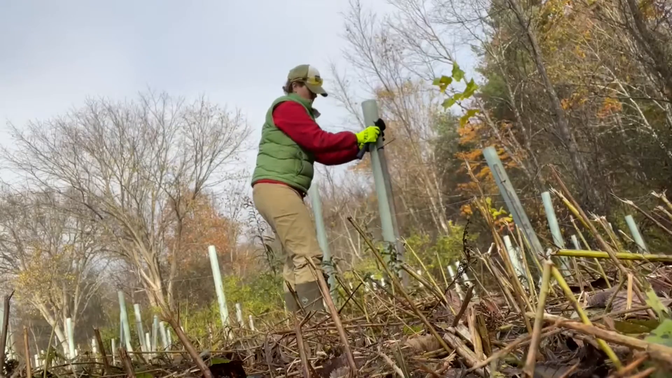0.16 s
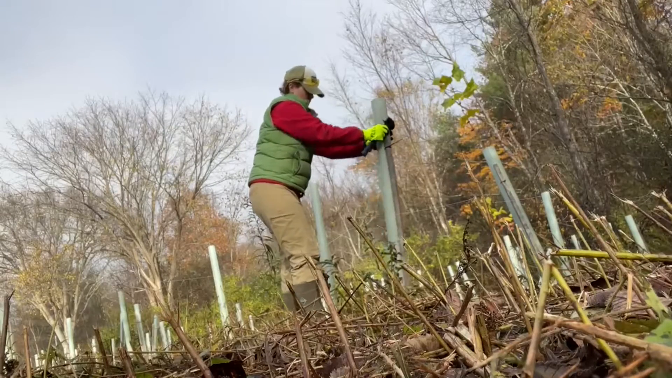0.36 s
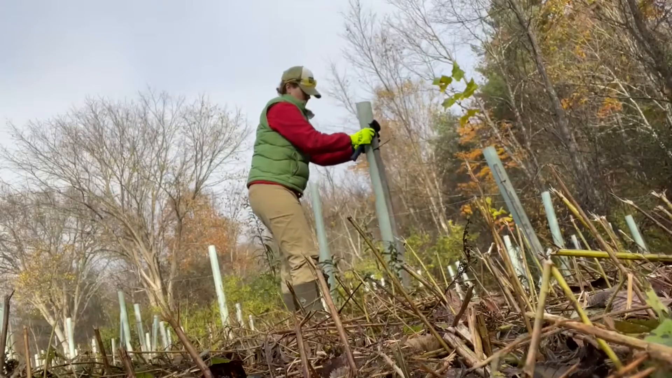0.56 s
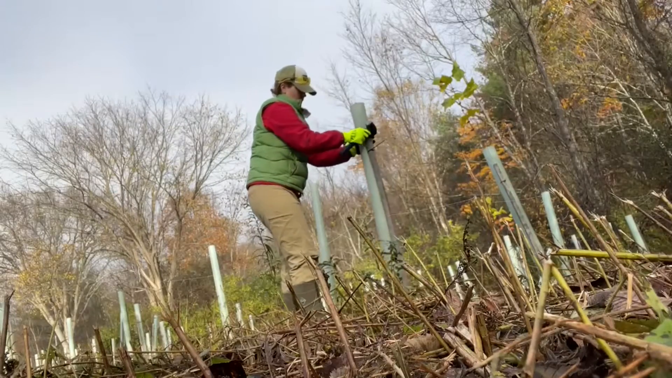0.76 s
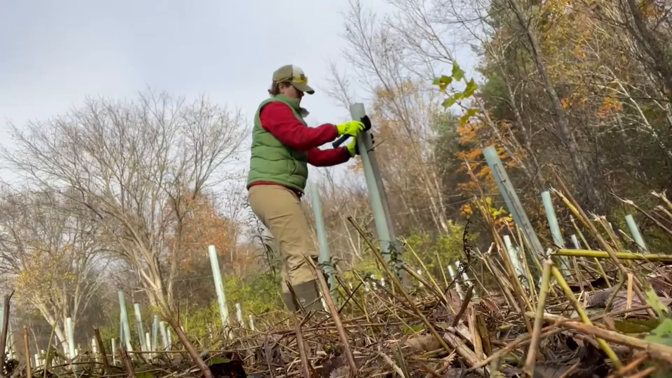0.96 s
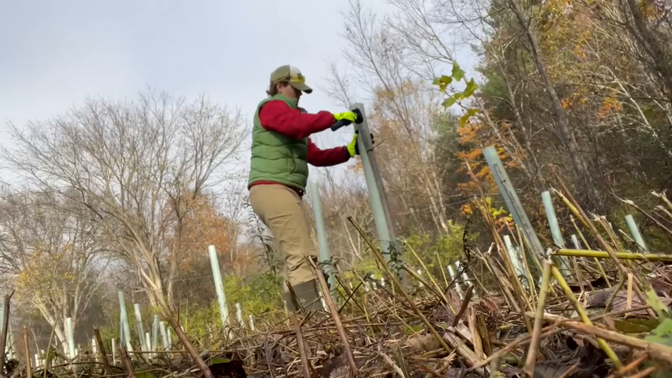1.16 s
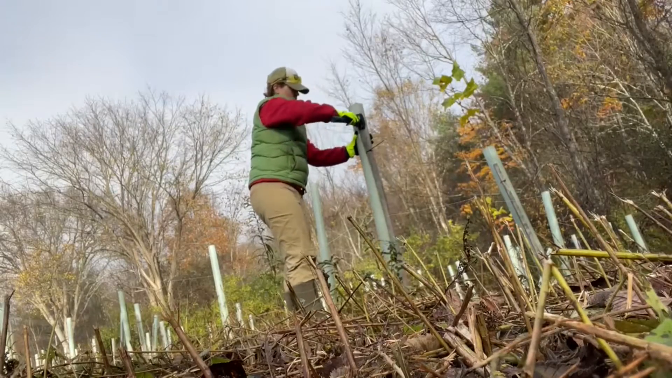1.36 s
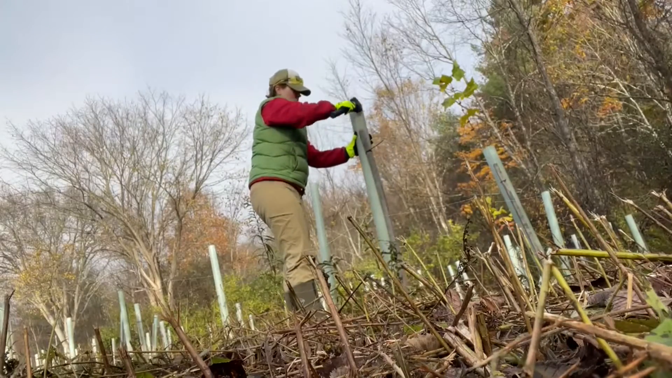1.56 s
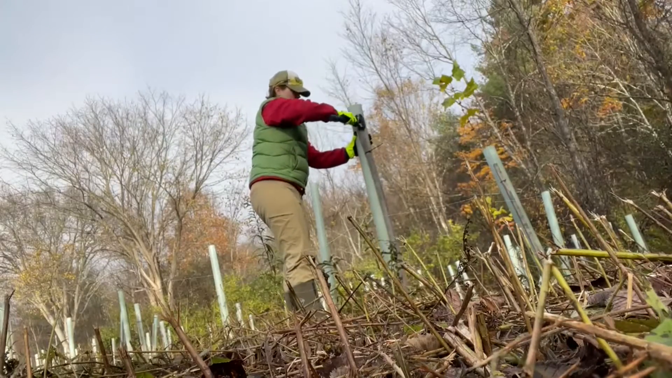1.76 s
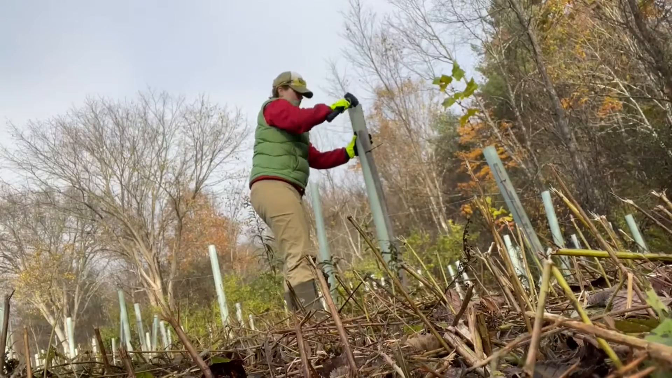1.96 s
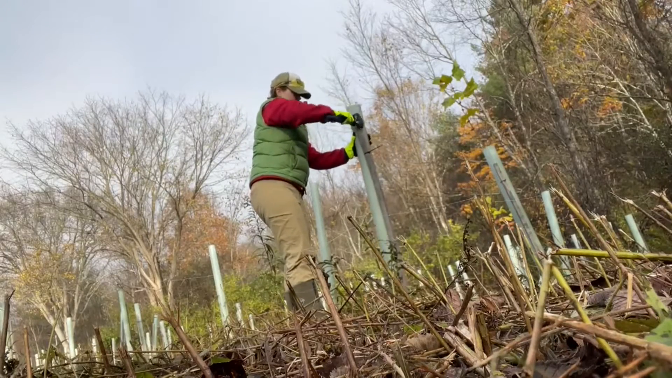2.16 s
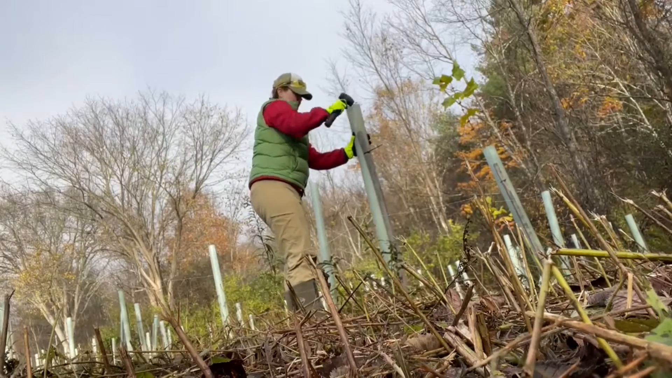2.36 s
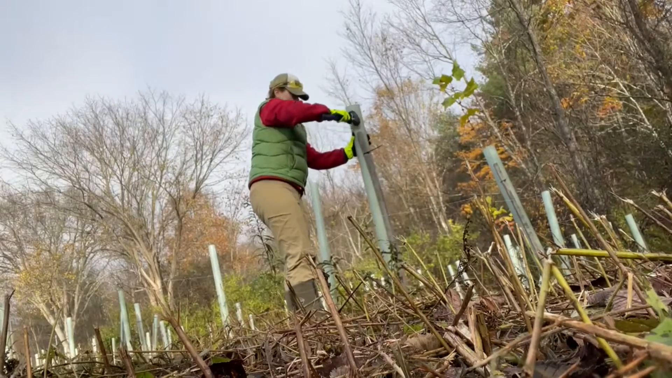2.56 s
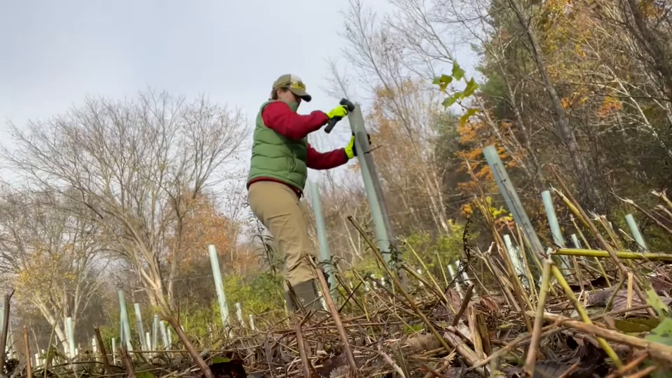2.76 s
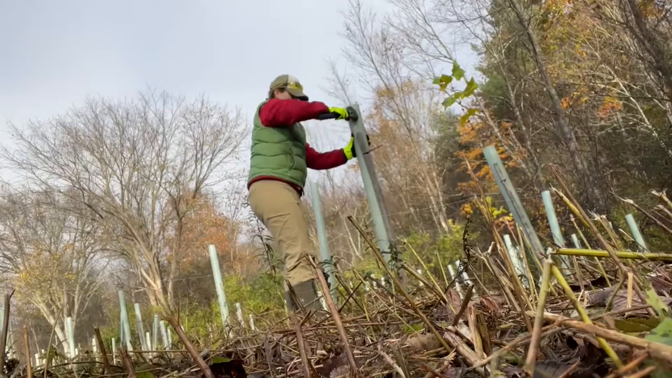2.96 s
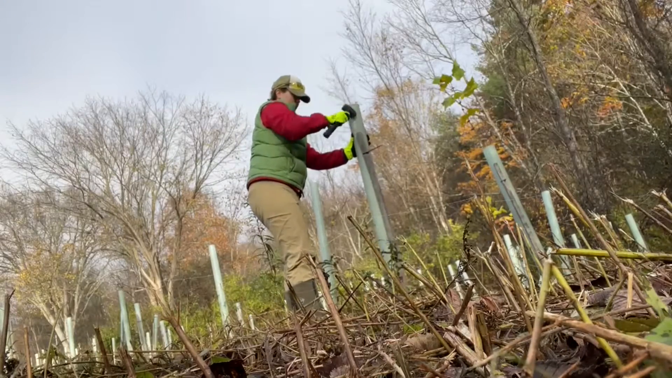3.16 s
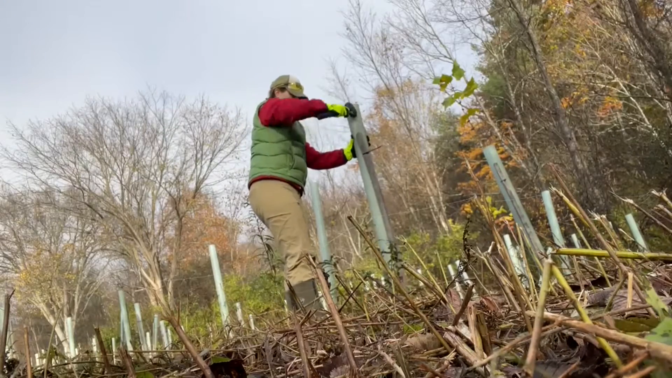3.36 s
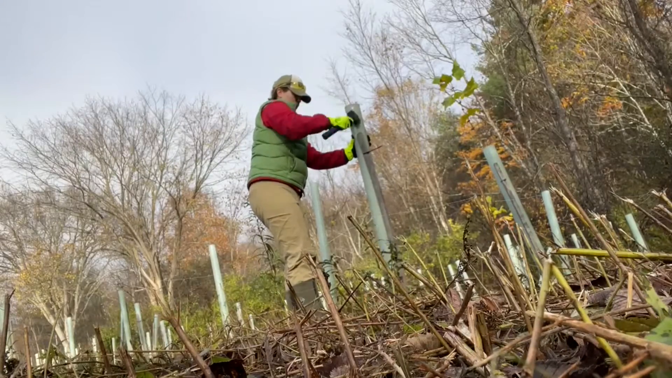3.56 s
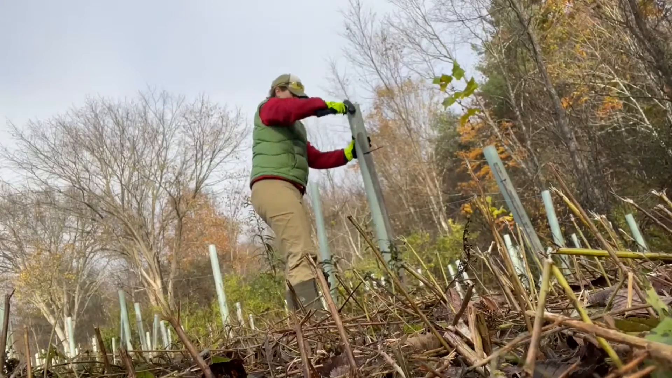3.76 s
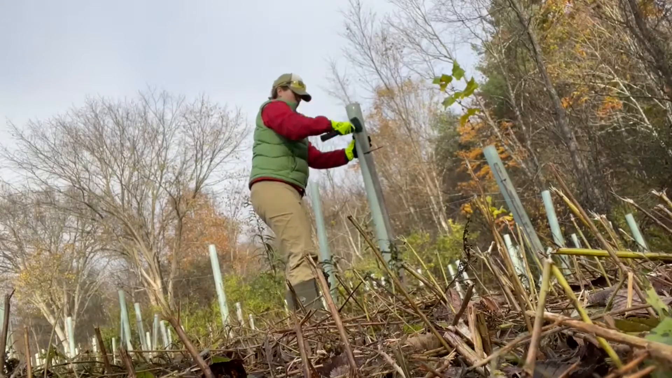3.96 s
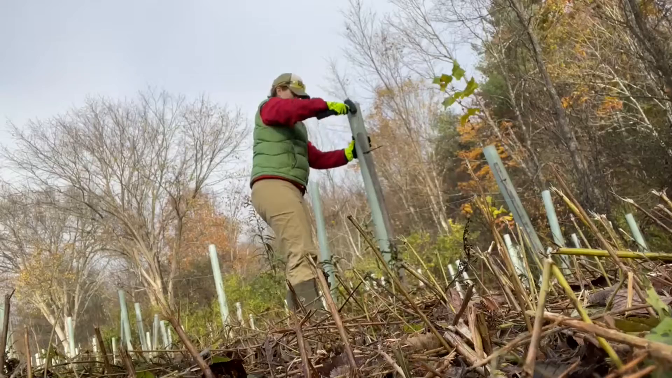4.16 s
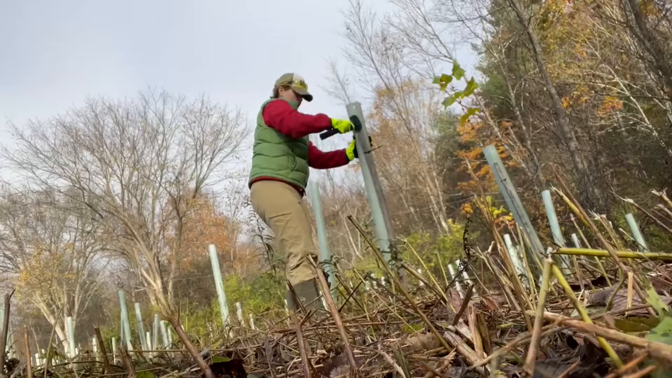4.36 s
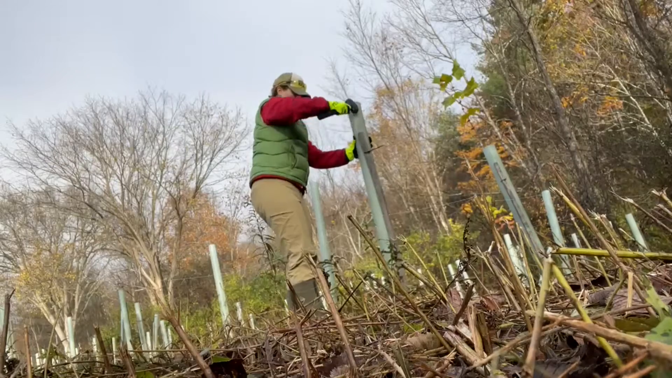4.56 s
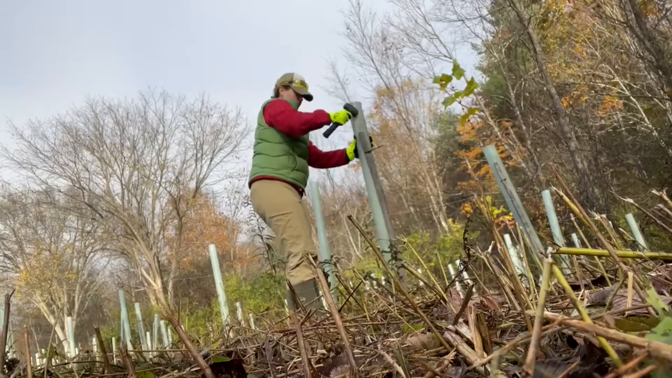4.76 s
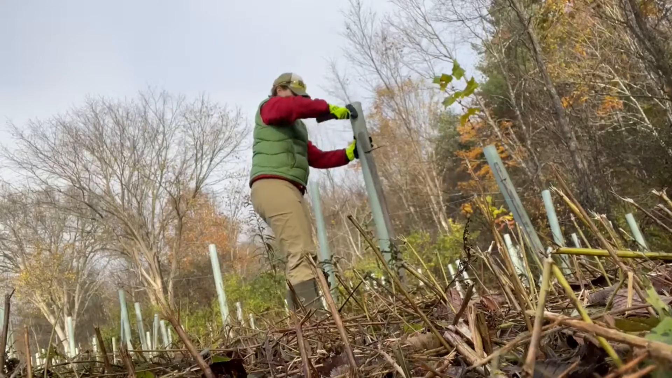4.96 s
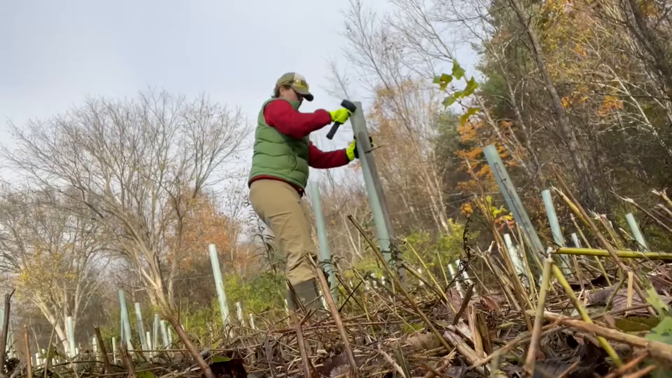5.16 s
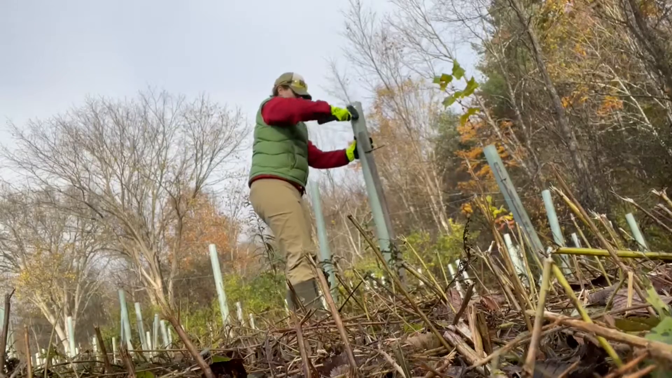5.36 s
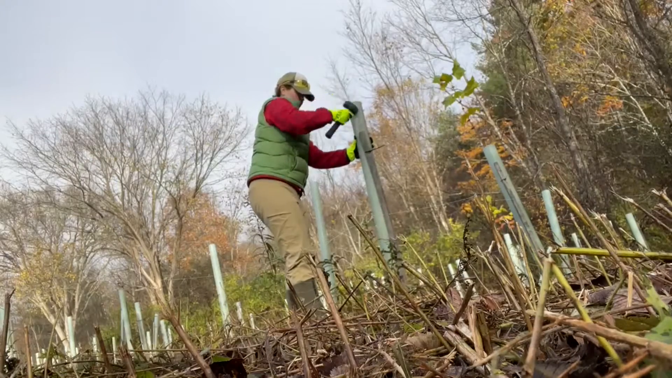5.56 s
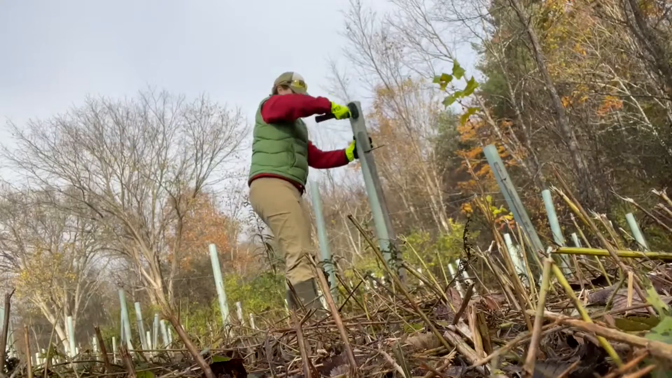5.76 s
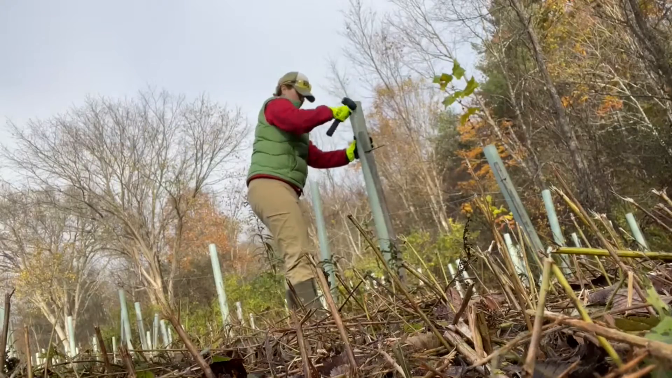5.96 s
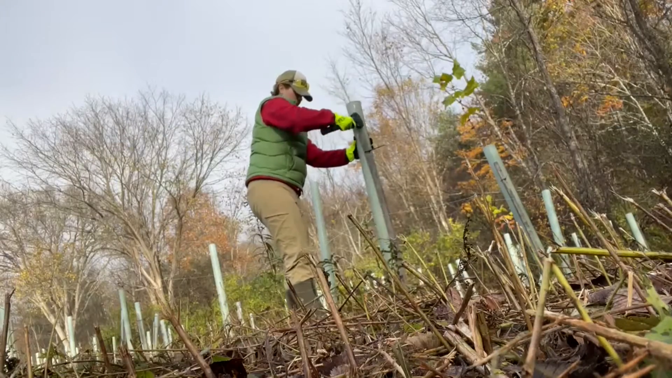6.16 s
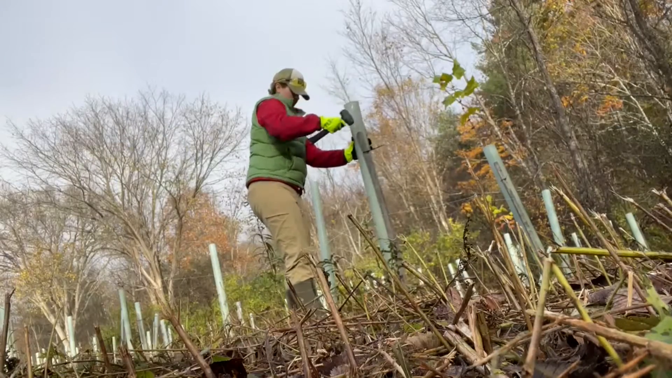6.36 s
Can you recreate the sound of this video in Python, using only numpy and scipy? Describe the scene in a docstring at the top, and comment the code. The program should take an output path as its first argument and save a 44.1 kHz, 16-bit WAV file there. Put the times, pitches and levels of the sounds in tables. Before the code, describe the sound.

Outdoors on a wooded slope, a faint wash of distant traffic and a few tiny twig ticks come first. After a soft opening tap, a hammer hits a wooden stake about every 0.4 seconds until the end. Each blow is a dry, sharp crack with a hollow woody knock and a brief scatter from brush and trees. A phone on the ground picks it up from some metres away, in stereo.

```python
"""A hammer drives a wooden stake inside a plastic tree guard on a wooded slope, some metres from a phone on the ground.
Each blow is a noisy crack, fading tones of stake and guard, and a soil thud that is louder the firmer the stake sits.
Fading noise makes the scatter from brush and trees; short noise grains make ticks of twigs and the guard's tie.
Light knocks of the stake in the guard are fading tones too; distant traffic is coloured, slowly swelling noise.
The phone hears it at two mic ports, and passes low tones late."""
import sys
import numpy as np
from scipy import signal
from scipy.fft import rfft, irfft, next_fast_len
from scipy.io import wavfile
from scipy.ndimage import uniform_filter1d

SR = 44100
rng = np.random.default_rng(int(sys.argv[2]) if len(sys.argv) > 2 else 0)


def store_wav(level_fs):
    """Save 16-bit WAV to argv[1]."""
    pcm = np.round(np.clip(np.atleast_2d(level_fs), -1, 1) * 32767)
    wavfile.write(sys.argv[1], SR, pcm.T.astype(np.int16))


N = 282315  # length of the scene [samples]
SOUND_N = SR // 5  # length of one struck sound [samples]
LEFT_RIGHT = np.array([[.5], [-.5]])  # each port takes half of a left-right difference


def undb(db):
    """Turn decibels into a plain factor."""
    return 10 ** (np.asarray(db) / 20)


def peak(x, db):
    """Scale a sound so that its highest point has this level [dB]."""
    return x * undb(db) / np.max(np.abs(x))


def along(table, hz):
    """Read a table of (frequency [Hz], value) on a log-frequency axis."""
    points = np.array(table)
    return np.interp(np.log(hz + 1), np.log(points[:, 0] + 1), points[:, 1])


def shape(x, gain):
    """Filter by a gain, possibly complex, that is a function of frequency."""
    size = next_fast_len(x.shape[-1] + SR // 2)
    hz = np.arange(size // 2 + 1) * SR / size
    return irfft(rfft(x, size) * gain(hz), size)[..., :x.shape[-1]]


def add(out, s, sound):
    """Mix a sound in at a time [s], cut off at the end of the scene."""
    i = int(s * SR)
    out[..., i:i + sound.shape[-1]] += sound[..., :N - i]


def burst(t60):
    """Noise that starts at once and dies away by 60 dB in t60 seconds."""
    t = np.arange(SOUND_N) / SR
    return rng.standard_normal(SOUND_N) * 1000. ** (-t / t60)


# colour of the road noise: (frequency [Hz], level [dB])
TRAFFIC_COLOUR = [(15, -27.5), (25, -3.5), (36, -17), (53, 1.5), (146, -4), (273, -10), (358, -11),
                  (399, -13), (1060, -21), (1150, -23), (1880, -33), (2530, -28), (4730, -31.5),
                  (7000, -44), (10000, -48.5), (12000, -46), (14400, -64), (16500, -79.5)]
# how alike the noise is at the two ports: (frequency [Hz], likeness [0-1])
TRAFFIC_ALIKE = [(60, 1), (200, 0.75), (600, 0.78), (2500, 0.35), (7000, 0), (15000, 0.2)]
# how much louder the left port hears, for traffic and stake: (frequency [Hz], left minus right [dB])
PORT_DB = [(60, 1.5), (110, -2.5), (200, -1), (380, -2), (700, -6), (1290, -2.5), (2380, 1.5), (4400, 1),
           (8120, 6), (15000, -4.5)]
TRAFFIC_DB = -44.5  # average (RMS) level over both ports
TRAFFIC_LAG_S = 0.00042  # the left port hears the shared noise this much later


def walk(rate):
    """Smoothed random steps, `rate` of them per second, for slow swells."""
    k = int(SR / rate)
    steps = np.repeat(rng.standard_normal(N // k + 1), k)
    return uniform_filter1d(steps, k)[:N]


def traffic():
    """Far road noise from the right, partly shared by the ports; its rumble swells more than its hiss."""
    same, left, right = rng.standard_normal((3, N))
    late = shape(same, lambda f: np.exp(-2j * np.pi * f * TRAFFIC_LAG_S))
    shared, separate = np.array([late, same]), np.array([left, right])
    alike = lambda f: np.clip(along(TRAFFIC_ALIKE, f), 0, 1)
    noise = shape(shared, lambda f: np.sqrt(alike(f))) + shape(separate, lambda f: np.sqrt(1 - alike(f)))
    noise = shape(noise, lambda f: undb(along(TRAFFIC_COLOUR, f) + along(PORT_DB, f) * LEFT_RIGHT))
    rumble = shape(noise, lambda f: 1 / (1 + (f / 400) ** 2))
    hiss = noise - rumble
    noise = rumble * undb(1.5 * walk(3)) + hiss * undb(.9 * walk(1.5) + .6 * walk(9))
    return noise * undb(TRAFFIC_DB) / np.sqrt(np.mean(noise ** 2))


# twigs and the guard's tie:
# (time [s], grain peak level [dB], grain centre [Hz], snap above the grain [dB], grain t60 [s])
TICKS = [(0.2384, -47, 10000, -20, 0.006), (0.275, -36.5, 5000, -21, 0.009), (0.294, -40, 4300, -9, 0.01),
         (0.349, -40.5, 4300, 1, 0.008), (2.884, -36, 9000, 3, 0.0069), (3.818, -46, 3300, -4, 0.03),
         (3.829, -35, 4000, 0.5, 0.0087), (4.463, -40, 5000, 5, 0.008), (4.8686, -16, 12000, -5, 0.002),
         (5.009, -34.5, 3040, -9.5, 0.0074), (5.015, -36, 4000, -3, 0.008),
         (5.020, -42.5, 4500, 11, 0.0057)]
SNAP_T60_S = 0.01


def tick(db, hz, body_db, t60):
    """A dry click: a grain of noise around one frequency, over a short broad snap."""
    grain = shape(burst(t60), lambda f: 1 / (1 + ((f - hz) / (0.5 * hz)) ** 2))
    snap = shape(burst(SNAP_T60_S), lambda f: f / (f + 900) / (1 + f / 6000))
    return undb(db) * (peak(grain, 0) + peak(snap, body_db))


# how strongly brush and trees scatter sound back: (frequency [Hz], level [dB])
WOODS_COLOUR = [(60, -10.5), (150, 6), (300, 0.5), (600, 4), (1200, -9.5), (1900, -4.5), (2800, 1),
                (4500, -3.5), (7000, -3), (11000, -1), (16000, 1)]
WOODS_DB, WOODS_T60_S, WOODS_EDGE_S = -24.5, 0.56, 0.067  # trunks: strength, fade and slow rise
BRUSH_DB, BRUSH_T60_S, BRUSH_EDGE_S = -2.5, 0.079, 0.00036  # nearby brush: strength, fade and quick rise
BRUSH_THIN_HZ, BRUSH_DULL_HZ = 300, 2800  # brush returns little bass and little treble
BRUSH_WIDTH = 0.7  # brush lies in one direction: share of the width that the trunks have
# trunks stand in clumps, so the tail is patchy; bass and treble come from different clumps
PATCHY_DB, PATCH_S, PATCH_SPLIT_HZ = 3.0, .015, 1300


def woods(sound):
    """Brush nearby smears a sound; clumps of trunks return it later, longer and unevenly, differing by port."""
    t = np.arange(SR) / SR
    patches = rng.standard_normal((2, 200))
    bass_clumps, treble_clumps = [undb(PATCHY_DB * np.interp(t / PATCH_S, np.arange(200), row)) for row in patches]
    far = undb(WOODS_DB) * (1 - np.exp(-(t / WOODS_EDGE_S) ** 2)) * 1000. ** (-t / WOODS_T60_S)
    near = undb(BRUSH_DB) * (1 - np.exp(-t / BRUSH_EDGE_S)) * 1000. ** (-t / BRUSH_T60_S)
    chance = rng.standard_normal((2, SR)) / np.sqrt(SR / 100)
    bass = signal.lfilter(*signal.butter(2, PATCH_SPLIT_HZ, fs=SR), chance)
    trunks = (bass * bass_clumps + (chance - bass) * treble_clumps) * far
    dull = signal.lfilter(*signal.butter(1, [BRUSH_THIN_HZ, BRUSH_DULL_HZ], "band", fs=SR), chance)
    mid, side = trunks + dull * near * np.array([[1], [BRUSH_WIDTH]])
    # long waves reach both ports alike
    side = shape(side, lambda f: f / (f + 400))
    tail = np.array([mid + 1.52 * side, mid - 1.85 * side])
    # countless scatterers keep the colour of the sound but blur its lines over two thirds of an octave
    hz, energy = np.arange(SR // 2 + 1), np.cumsum(np.abs(rfft(sound, SR)) ** 2)
    energy_below = lambda f: np.interp(f, hz, energy)
    half_band = 2 ** (1 / 3)
    blurred = lambda f: np.sqrt((energy_below(f * half_band) - energy_below(f / half_band)) / (.5 * f + 1))
    return shape(tail, lambda f: blurred(f) * undb(along(WOODS_COLOUR, f)))


# what rings, part by part: (frequency [Hz], level within the part [dB], t60 [s]);
# bending, guard, low overtone, knock, shoulder and end grain give a multiple of the asked pitch instead of Hz
RINGS = {"soil": [(67.5, 0, 0.06)], "bending": [(1, 0, 0.026)], "guard": [(1, 0, 0.07)],
         "low overtone": [(1, 0, 0.043)], "high overtone": [(688, 3, 0.044)], "knock": [(1, 9, 0.015)],
         "twin": [(887, 0, 0.024)], "shoulder": [(1, -2, 0.024)], "end grain": [(.76, 0, 0.0086),
         (1, 0.5, 0.0082)], "splinter": [(2850, 3.5, 0.0065), (3590, -9.5, 0.015), (3734, 1, 0.0094),
         (3927, -3, 0.0096), (5247, -1, 0.011)]}
# shape of each part's fade: part -> power [no unit];
# above 1 it holds, then stops quickly; below 1 it drops fast, then lingers
FADE_POWER = {"guard": 1.24, "soil": 1.7, "knock": 1.58, "twin": 1.75, "bending": 2, "low overtone": 0.86,
              "end grain": 2.07, "splinter": 1.585}
SCATTER_DB, DETUNE = 2.0, .008  # typical chance spread of strength [dB] and pitch [share]


def ring(part, pitch_hz=1):
    """Fading tones of a struck part; every blow lands elsewhere, so strengths and pitches scatter."""
    t = np.arange(SOUND_N) / SR
    hz, db, t60 = np.transpose(RINGS[part])[:, :, None]
    pitch_chance, level_chance = rng.standard_normal((2, len(hz), 1))
    hz = hz * pitch_hz * (1 + DETUNE * pitch_chance)
    strength = undb(db + SCATTER_DB * level_chance)
    fade = 1000. ** -(t / t60) ** FADE_POWER.get(part, 1)
    return np.sum(strength * np.sin(2 * np.pi * hz * t) * fade, axis=0)


# hammer blows; part levels are relative to the knock, before the bass is thinned:
# (time [s], knock level [dB], knock [Hz], bite in the soil [0-1], hardness of the contact [dB],
#  guard [dB], guard [Hz], shoulder [dB], crack [dB], low overtone [dB], low overtone [Hz],
#  high overtone [dB], twin [dB], shoulder [Hz], end grain [Hz])
BLOWS = [(1.381, -26, 760, 0.71, -11, 1.5, 307, -15, -8, -4, 435, -20, -18, 1330, 2700),
         (1.724, -5.5, 890, 0.25, -7, -11.5, 305, -13, -10, -11.5, 450, -11.5, -30, 1260, 2350),
         (2.097, -7.5, 977, 0.22, 2, -11.5, 368, -6.5, -6, -13, 520, -22, -7.5, 1495, 2260),
         (2.475, -5, 1040, 0.35, 0, -13, 360, -7, -8, -16.5, 560, -14.5, -8.5, 1495, 2220),
         (2.855, -3.5, 978, 0.52, -3, -9, 363, -9, -13, -8, 470, -9.5, -17, 1395, 2180),
         (3.24, -3.5, 910, 0.67, -3, -9.5, 362, -10, -11, -7, 506, -7.5, -26, 1400, 2140),
         (3.626, -3.5, 943, 0.69, -1.5, -14.5, 367, -15, -11, -6, 522, -10, -14.5, 1300, 2250),
         (4.014, -3.5, 956, 0.77, -2.7, -13.5, 365, -8.5, -8, -3.5, 508, -10.5, -14, 1442, 2210),
         (4.417, -3.5, 1000, 0.77, -1, -17.5, 357, -8, -7, -3, 530, -11, -20.5, 1440, 2210),
         (4.809, -10.5, 975, 0.99, 3, -8.5, 356, -1, -7.5, 2, 584, -4, -5.5, 1317, 2200),
         (5.215, -9, 985, 0.91, 0.6, -8, 361, -4.5, -4.5, 0.5, 523, -3.5, -10, 1280, 2100),
         (5.611, -7.5, 986, 0.89, -2.4, -19, 357, -3.5, -6.5, 2, 516, -5, -8, 1453, 2120),
         (6.018, -9.5, 995, 0.99, -0.3, -9, 363, -3, -10, 5.5, 533, -5.5, -5.5, 1297, 2160)]
# colour of the crack: (frequency [Hz], level [dB])
CRACK_COLOUR = [(3000, -15.5), (4800, -9), (6500, 7.5), (8000, 0), (10500, 2.5), (13000, -5.5),
                (16000, -14)]
# the firmer the stake sits, the more its low parts sound:
# part -> (level above the knock when loose [dB], when firm [dB])
BITE_DB = {"soil": (-26, -9.5), "bending": (-35.5, 6)}
# a harder contact lifts the bright parts together: part -> level above the knock at zero hardness [dB]
BRIGHT_DB = {"end grain": -1, "splinter": 2}
BEND_HZ = 200
SOIL_RISE_S = 0.003  # the soil gives way slowly
WOOD_THIN_HZ = 160  # the ringing parts of the wood are weak below this tone
RADIATES_HZ = 36.2  # the slim stake sends out little below this tone
CONTACT_S = 0.0003  # the hammer needs about this long to load the stake


def blow(db, knock_hz, bite, hard_db, guard_db, guard_hz, shoulder_db, crack_db,
         overtone_db, overtone_hz, upper_db, twin_db, shoulder_hz, grain_hz):
    """Steel on end grain: crack, knock, bending stake, guard and soil sound together."""
    t = np.arange(SOUND_N) / SR
    contact = burst(.007) + undb(-24) * burst(.05)
    crack = shape(contact, lambda f: undb(along(CRACK_COLOUR, f)) * (f > 2500))
    low_db = {part: loose + bite * (firm - loose) for part, (loose, firm) in BITE_DB.items()}
    soil = peak(ring("soil") * (1 - np.exp(-(t / SOIL_RISE_S) ** 2)), low_db["soil"])
    bending = peak(ring("bending", BEND_HZ), low_db["bending"])
    # soil is subtracted, so that no gap opens between the thud and the bending tone
    low = bending - soil
    parts = [peak(ring("knock", knock_hz), 0),
             peak(ring("twin"), twin_db),
             peak(ring("guard", guard_hz), guard_db),
             peak(ring("low overtone", overtone_hz), overtone_db),
             peak(ring("high overtone"), upper_db),
             peak(ring("shoulder", shoulder_hz), shoulder_db),
             peak(ring("end grain", grain_hz), BRIGHT_DB["end grain"] + hard_db),
             peak(ring("splinter"), BRIGHT_DB["splinter"] + hard_db),
             peak(crack, crack_db)]
    wood = shape(sum(parts), lambda f: (1j * f / (WOOD_THIN_HZ + 1j * f)) ** 2)
    radiated = shape(wood + low, lambda f: (1j * f / (RADIATES_HZ + 1j * f)) ** 4)
    return undb(db) * radiated * (1 - np.exp(-t / CONTACT_S))


# the stake knocks lightly in the guard: (time [s], peak level [dB], pitch [Hz])
REBOUNDS = [(1.673, -49, 1120), (5.679, -33.5, 1000), (6.054, -26.5, 930)]


def rebound(db, hz):
    """A light knock of the stake in the guard: three of its ringing parts, with no crack or thud."""
    return peak(ring("knock", hz) + ring("high overtone") + ring("shoulder", 1380), db)


# phase between the ports for sound from the stake: (frequency [Hz], left leads by [radians])
PORT_RAD = [(0, 0), (1700, -.3), (4130, -1.9), (5860, -3.2), (7100, -3.3), (9650, -1.5), (11800, 0),
            (13400, .3), (16000, 1.8)]


def at_ports(direct):
    """The two ports of the phone hear the direct sound with their own level and lag."""
    lead = lambda f: np.exp(1j * LEFT_RIGHT * np.interp(f, *np.transpose(PORT_RAD)))
    return shape(direct, lambda f: undb(along(PORT_DB, f) * LEFT_RIGHT) * lead(f))


def scene():
    """Place every tick, blow and rebound with its scatter from the woods, over the traffic."""
    direct, scattered = np.zeros(N), np.zeros((2, N))
    for table, source in [(TICKS, tick), (BLOWS, blow), (REBOUNDS, rebound)]:
        for s, *how in table:
            sound = source(*how)
            add(direct, s, sound)
            add(scattered, s, woods(sound))
    return at_ports(direct) + scattered + traffic()


LATE_TURNS, LATE_LOW_HZ, LATE_HIGH_HZ = 2.1, 36.1, 541  # strength of the delay [turns], and its range
MIC_LOW_HZ, MIC_HIGH_HZ, TOP_HZ = 46, 15600, 16600  # bass limit, gentler treble limit, sharp top limit
CEILING = 1.15  # level that rounded peaks approach, before the top is cut


def record(dry):
    """The phone delays low tones most, drops deepest bass and highest treble, rounds peaks and cuts the top."""
    turns = lambda f: LATE_TURNS * np.log((1 + f / LATE_LOW_HZ) / (1 + f / LATE_HIGH_HZ))
    late = shape(dry, lambda f: np.exp(-2j * np.pi * turns(f)))
    no_bass = signal.sosfilt(signal.butter(3, MIC_LOW_HZ, "high", fs=SR, output="sos"), late)
    heard = shape(no_bass, lambda f: 1 / np.sqrt(1 + (f / MIC_HIGH_HZ) ** 16))
    rounded = CEILING * np.tanh(heard / CEILING)
    return signal.sosfilt(signal.ellip(10, .2, 80, TOP_HZ, fs=SR, output="sos"), rounded)


dry = scene()
out = record(dry)
store_wav(out)
```